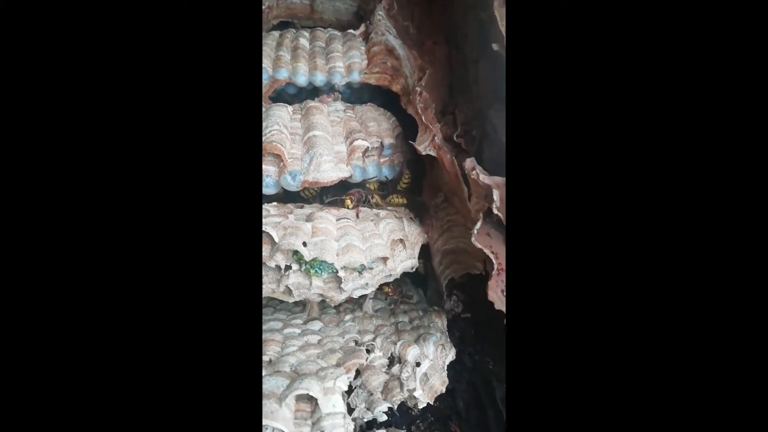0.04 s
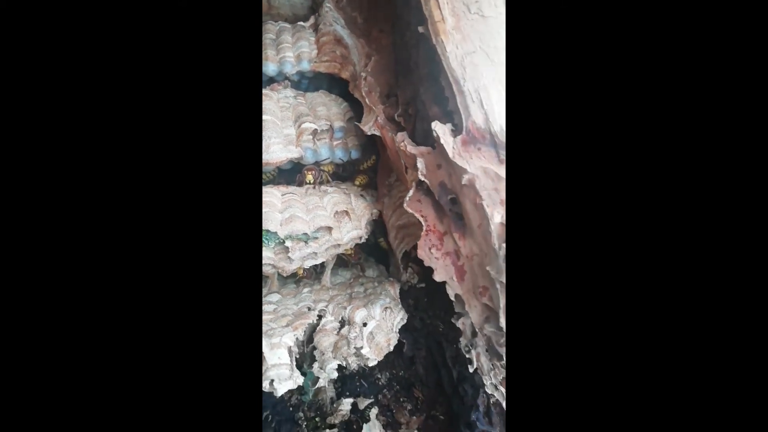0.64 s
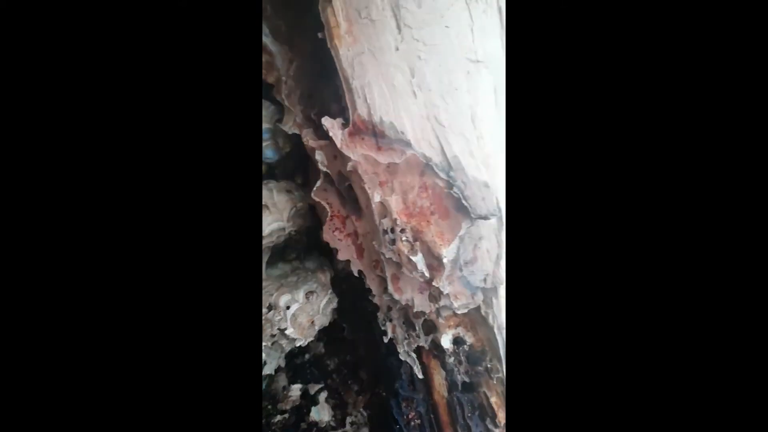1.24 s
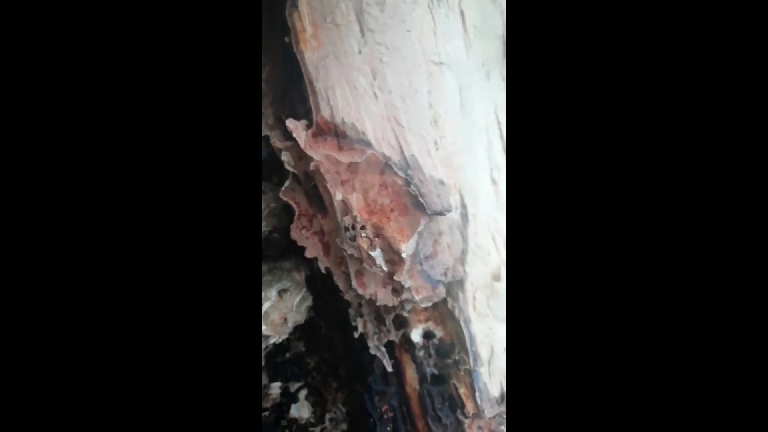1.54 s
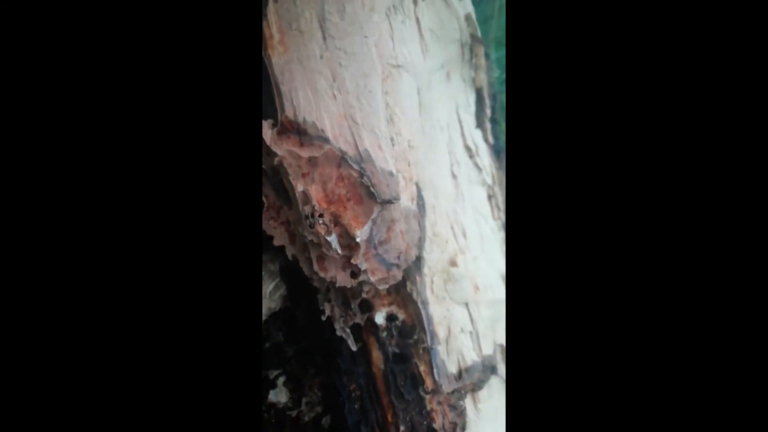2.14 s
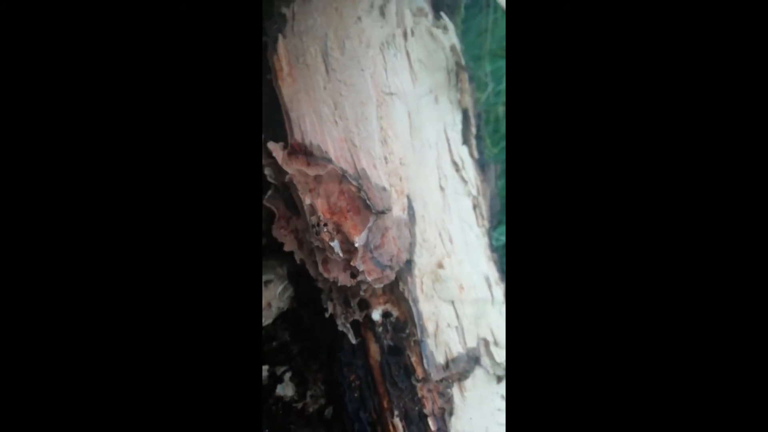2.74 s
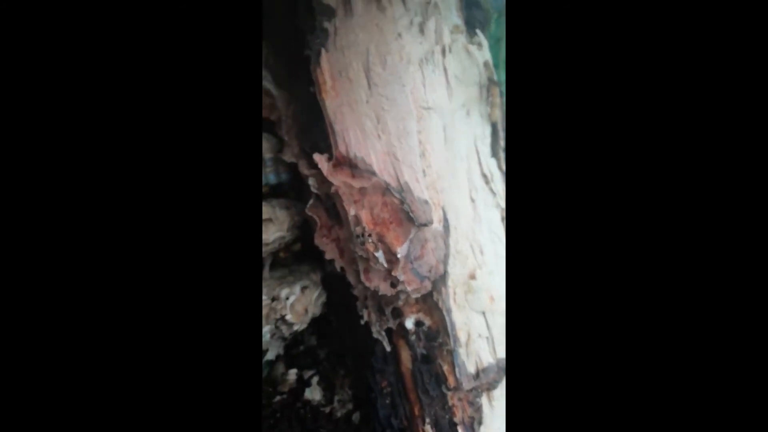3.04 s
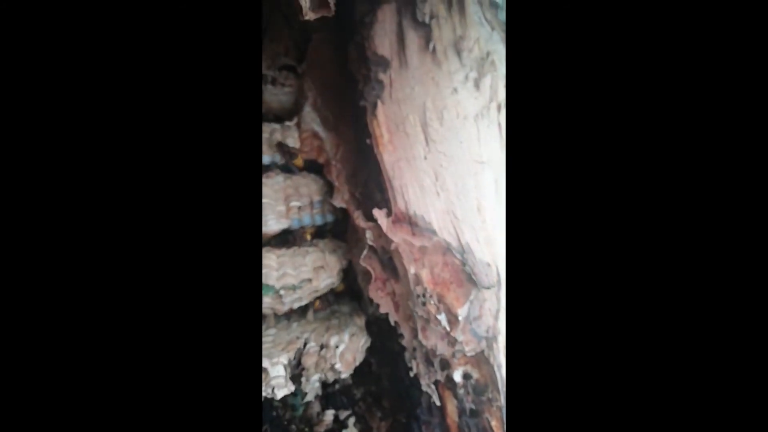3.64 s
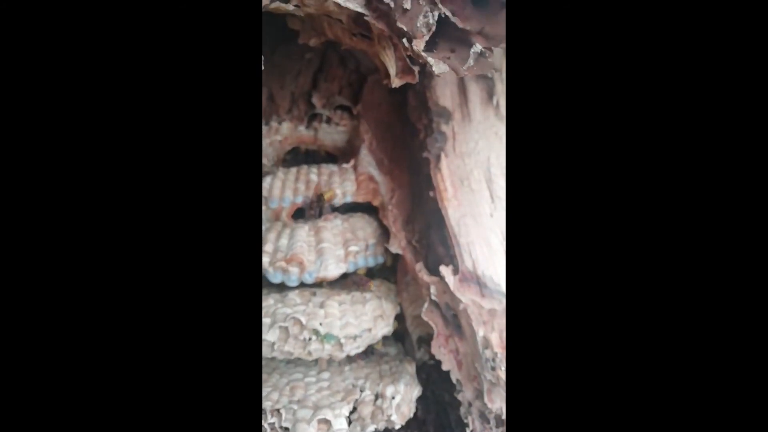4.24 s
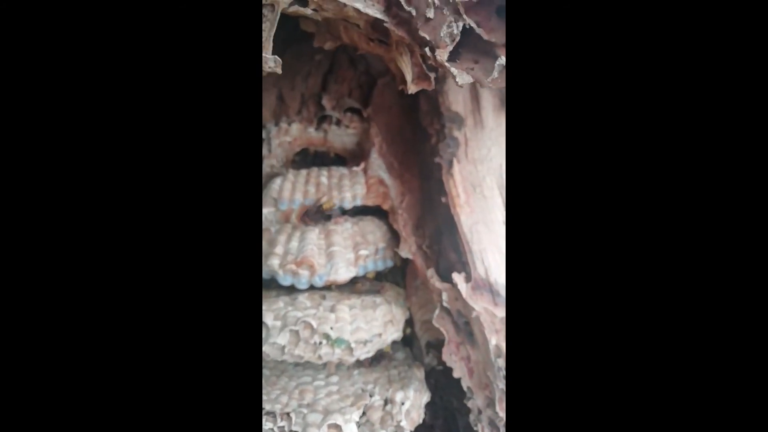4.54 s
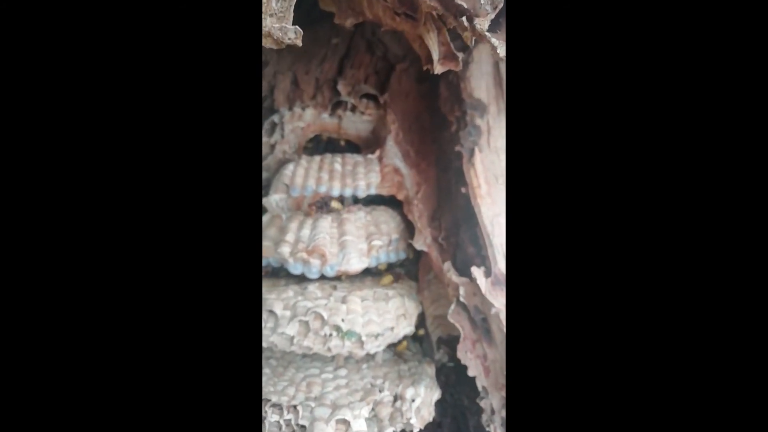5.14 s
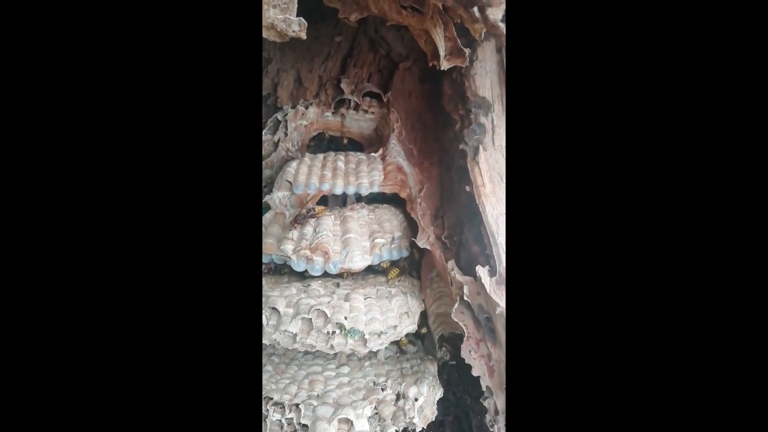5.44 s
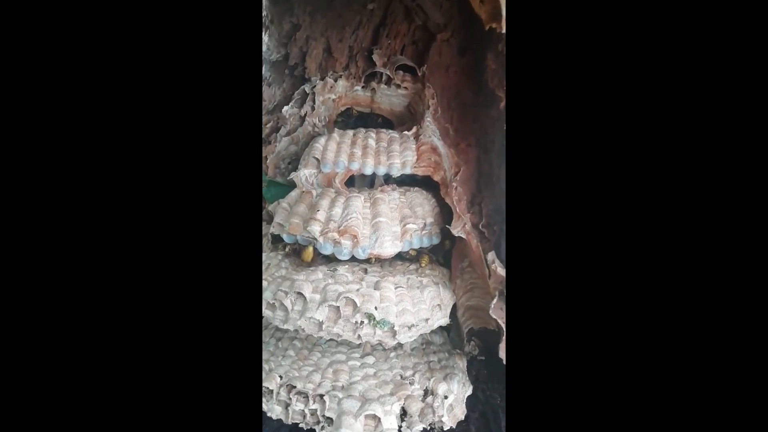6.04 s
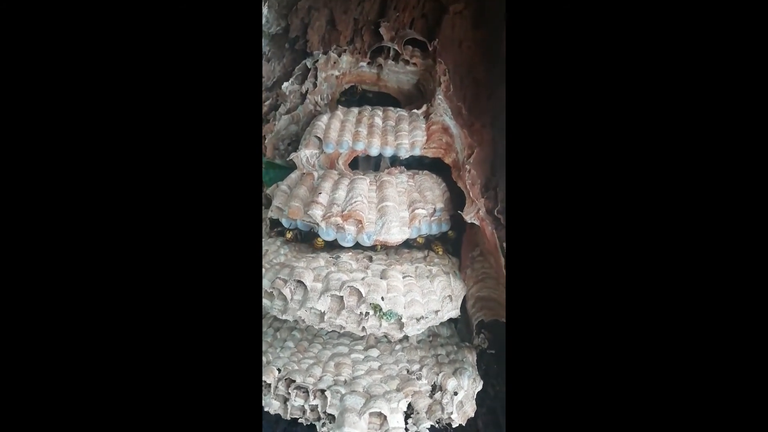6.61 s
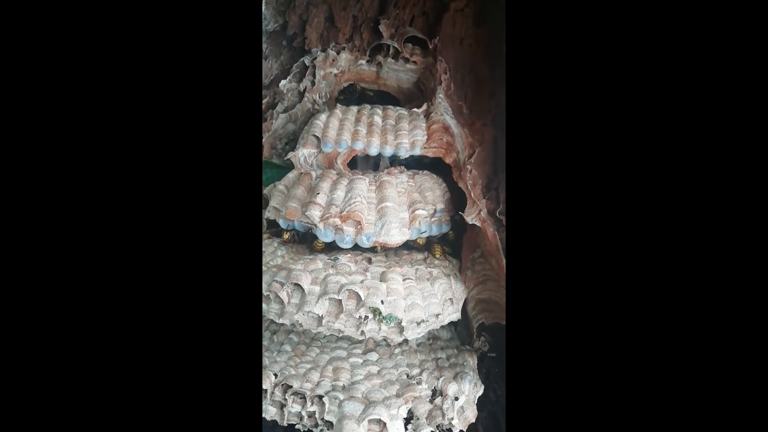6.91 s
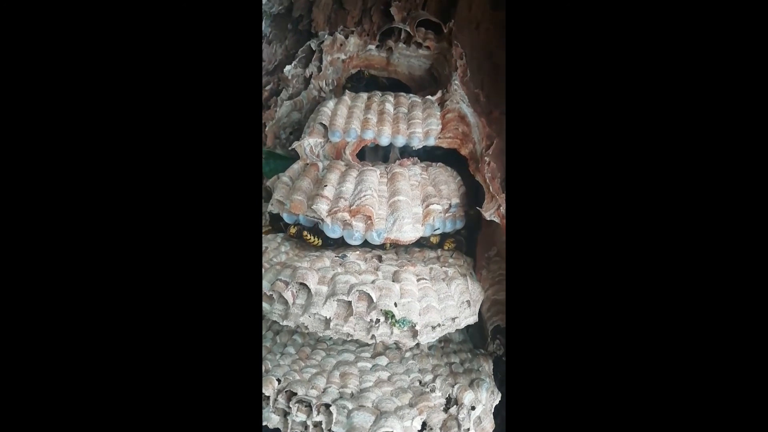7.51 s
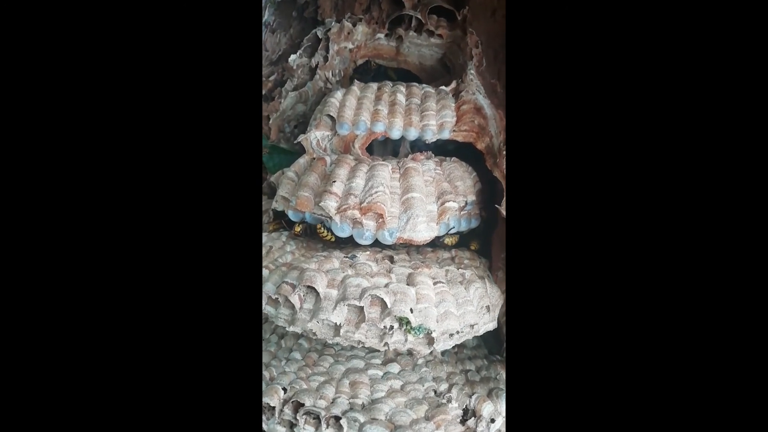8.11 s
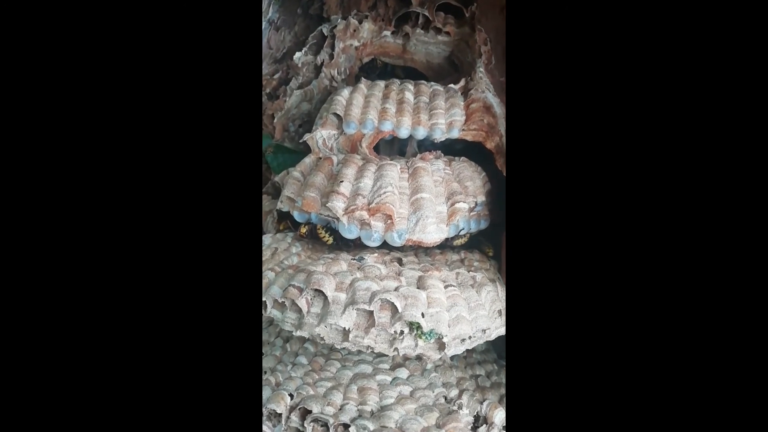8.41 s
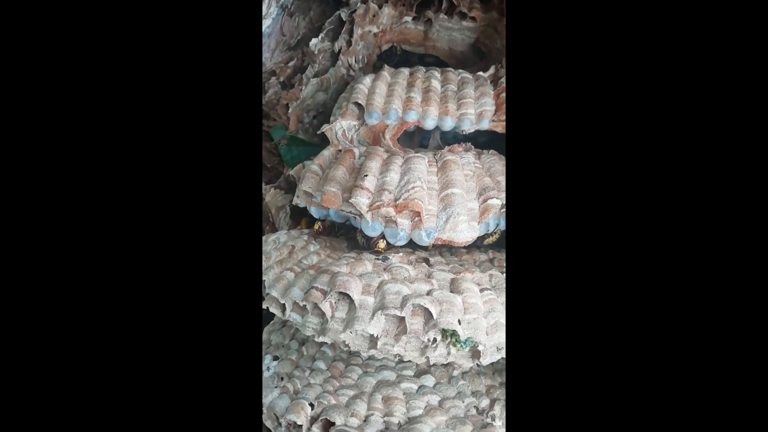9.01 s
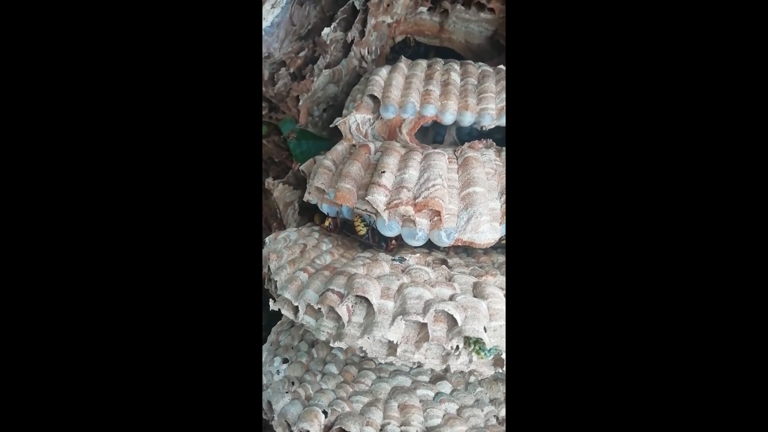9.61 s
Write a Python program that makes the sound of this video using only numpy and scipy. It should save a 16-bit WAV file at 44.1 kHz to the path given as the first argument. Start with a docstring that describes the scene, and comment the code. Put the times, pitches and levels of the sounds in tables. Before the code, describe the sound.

A hornet hovers close to a hand-held stereo microphone at the mouth of a hollow trunk, its low buzz wavering, then dulling to a hum and stopping about a third of the way in. Throughout, insects scrape and nibble the paper combs in irregular bouts of dry ticks and crackles. Puffs of wind bump the microphone, hardest near the end, over a faint woodland hiss.

```python
"""A hornet hovers at the mouth of a hollow trunk, close to a hand-held stereo microphone.
Its wingbeats pulse the air into a buzz, which dulls to a hum as it flies in, then stops.
Inside the trunk, workers scrape and nibble the paper combs in bouts of dry ticks.
Puffs of air bump the microphone now and then, over the hiss of a quiet wood."""
import sys
import numpy as np
from scipy import signal
from scipy.fft import rfft, irfft, next_fast_len
from scipy.io import wavfile
from scipy.ndimage import uniform_filter1d, map_coordinates

SR = 44100
rng = np.random.default_rng(int(sys.argv[2]) if len(sys.argv) > 2 else 0)


def wav_record(signal):
    """Record a signal, one row per channel, as 16-bit PCM in the file named by sys.argv[1]."""
    frames = np.transpose(np.atleast_2d(signal))
    bounded = np.clip(frames, -1, 1)
    # unit amplitude maps onto the largest positive 16-bit level
    quanta = np.round(bounded * 32767).astype(np.int16)
    wavfile.write(sys.argv[1], SR, quanta)


N = 434826


def amp(db):
    """Decibels to gain."""
    return 10 ** (np.asarray(db) / 20)


def unit(x):
    """Scaled to rms 1."""
    return x / np.sqrt(np.mean(x ** 2) + 1e-20)


def along(points, hz):
    """(frequency, value) points read on a log axis."""
    freqs, values = np.transpose(points)
    return np.interp(np.log(hz + 1), np.log(freqs + 1), values)


def curves(rows):
    """One value per sample for each column after the time."""
    times, *columns = np.transpose(rows)
    return [np.interp(np.arange(N) / SR, times, column) for column in columns]


def wobble(rate, size=N):
    """A smooth random curve, rate knots a second."""
    knots = rng.standard_normal(int(size * rate / SR) + 4)
    return map_coordinates(knots, [np.arange(size) * rate / SR])


def drift(rate, size):
    """Random knots joined by straight lines, rate a second."""
    knots = rng.standard_normal(int(size * rate / SR) + 2)
    return np.interp(np.arange(size) * rate / SR, np.arange(len(knots)), knots)


def swell(start, hold, attack_s, release_s):
    """An envelope that rises to 1 at start, holds and dies away."""
    t = np.arange(N) / SR - start
    return np.exp(np.minimum(t, 0) / attack_s - np.maximum(t - hold, 0) / release_s)


def coloured(x, spectrum, shift=1):
    """x through a (frequency, gain) spectrum whose frequencies are multiplied by shift."""
    size = x.shape[-1]
    padded = next_fast_len(size + size // 8)
    gain = amp(along(np.multiply(spectrum, [shift, 1]), np.fft.rfftfreq(padded, 1 / SR)))
    return irfft(rfft(x, padded) * gain, padded)[..., :size]


def noise_pair(shared, size=N):
    """White noise for two microphones that share a part (0-1) of its power."""
    common = np.sqrt(shared) * rng.standard_normal(size)
    return common + np.sqrt(1 - shared) * rng.standard_normal((2, size))


def panned(side_db):
    """Constant-power gains, left louder than right by side_db."""
    gains = amp(np.array([side_db, -side_db]) / 2).reshape(2, -1)
    return gains / np.sqrt(np.mean(gains ** 2, axis=0))


# The hiss all around the trunk: (frequency [Hz], gain [dB])
HISS_SPECTRUM = [(35, -46), (60, -35), (230, -7), (400, -17), (620, -20), (1300, -15), (1900, -20),
                 (5300, -22), (7200, -26), (8600, -18), (10200, -27), (15800, -27.5)]

def air(level_db=-71.5):
    """The steady hiss of a quiet wood and of the microphone."""
    return amp(level_db) * unit(coloured(noise_pair(0.026), HISS_SPECTRUM))


# Puffs of air right on the microphone: (time [s], level [dB], eddy life [s])
PUFFS = [(.697, -39, 0.022), (0.95, -31, 0.15), (1.317, -32.5, 0.021), (2.249, -40.5, 0.15),
         (2.659, -37.5, 0.22), (3.42, -31.5, 0.13), (3.666, -29, 0.11), (3.987, -37, 0.053),
         (4.489, -38, 0.026), (4.507, -34, 0.052), (5.475, -45, 0.065), (8.619, -25, 0.025),
         (8.643, -21.5, 0.035), (8.689, -20, 0.075), (8.788, -28, 0.086), (9.348, -41, 0.01),
         (9.457, -38.5, 0.042)]
# The light draught between puffs: (time [s], level [dB])
DRAUGHT = [(0, -57.5), (1.8, -61), (3, -62), (5, -64.5), (7.2, -69.5), (9.86, -61.5)]
# The rumble of eddies and the thud of one buffet: (frequency [Hz], gain [dB])
RUMBLE_SPECTRUM = [(11, -26), (20, -7.5), (40, 3), (64, 0), (81, -4.5), (151, -11.5), (275, -27),
                   (334, -28.5), (500, -56), (650, -58), (1100, -120)]
THUD_SPECTRUM = [(15, -10), (50, 9.5), (90, 6.5), (140, -5), (200, -14.5), (300, -34), (480, -57),
                 (1400, -120)]

def wind_on_microphone(eddy_db=-11.5, thud_db=-2, push_s=0.00986, shared=0.95):
    """Each puff buffets the microphone and stirs up low eddies, nearly the same on both sides."""
    eddies = [amp(db + eddy_db) * swell(s, 0, 0.75 * life, life) for s, db, life in PUFFS]
    level = np.hypot(amp(curves(DRAUGHT)[0]), np.max(eddies, axis=0))
    lumpy_air = noise_pair(shared) * amp(4.5 * wobble(22))
    out = level * unit(coloured(lumpy_air, RUMBLE_SPECTRUM))
    size = 16384
    push = np.exp(-((np.arange(size) - size // 2) / SR / push_s) ** 2 / 2)
    for s, db, _ in PUFFS:
        shift = np.exp(0.031 * (db + 30))  # faster air hits harder and sheds higher eddies
        thud = coloured(noise_pair(shared, size) * push, THUD_SPECTRUM, shift) * np.hanning(size)
        start = round((s + push_s) * SR) - size // 2
        out[:, start:start + size] += amp(db + thud_db) * thud / np.max(np.abs(thud))
    return out


# How long the inside of the trunk rings: (frequency [Hz], time to fall 60 dB [s])
TRUNK_DECAY = [(300, 0.072), (3000, 0.17), (12000, 0.023)]

def trunk_echo(x):
    """The short answer of the trunk's cavity."""
    hz, t, spectra = signal.stft(rng.standard_normal((2, SR // 6)), SR, nperseg=256)
    decay = amp(-60 * t / along(TRUNK_DECAY, hz)[:, None])
    tail = signal.istft(spectra * decay, SR, nperseg=256)[1]
    return signal.fftconvolve(x, tail / np.linalg.norm(tail[0]), axes=1)[:, :N]


# A claw on paper, a thick fibre cracking, and fine scraping: (frequency [Hz], gain [dB])
CLAW_SPECTRUM = [(1500, -16.5), (4000, -13.5), (5500, -11.5), (7300, -5.5), (8900, 0.5), (10500, -12),
                 (15500, -25.5)]
CRACK_SPECTRUM = [(500, -60), (1100, -22), (1700, -5), (2800, 6.5), (3700, 0.5), (4900, 4), (7000, 4),
                  (12000, -29)]
SCRAPE_SPECTRUM = [(1000, -11), (1800, -7.5), (2800, -10.5), (4000, -12.5), (5300, -11), (6300, -10),
                   (7300, -7.5), (8700, -1), (9400, -8.5), (10500, -14), (12000, -22), (15500, -28)]

def rustle(strength, crunch_db, claw_db=-2.5, scrape_db=-7, scratches_per_s=200, rise_s=0.00071):
    """Many small scratches of feet and jaws on the combs, coming in fits over a finer scraping."""
    onsets = rng.random(N) < scratches_per_s / SR
    sizes = amp(6 * np.clip(rng.standard_normal(N), -2, 1.4))
    age = np.arange(SR // 100) / SR / rise_s
    scratches = unit(signal.fftconvolve(onsets * sizes, age ** 2 * np.exp(-2 * age))[:N])
    claws = amp(claw_db) * unit(coloured(noise_pair(0.044) * scratches, CLAW_SPECTRUM))
    crunch = amp(crunch_db - 5) * unit(coloured(noise_pair(0.11) * scratches, CRACK_SPECTRUM))
    scraping = amp(scrape_db) * unit(coloured(noise_pair(0.098), SCRAPE_SPECTRUM))
    fits = amp(1.5 * wobble(18))
    return strength * fits * (claws + scraping + crunch)


# The loudest snaps of paper fibres in the trunk: (time [s], level [dB], relative low crack [dB])
LOUD_SNAPS = [(.246, -34.5, -28), (.54, -36.5, -12), (.638, -34, -17), (.788, -38, -12), (1.0765, -30, -18),
              (1.088, -37, -24), (1.102, -38, -17), (1.119, -28.5, -19), (1.131, -32, -26),
              (1.142, -37, -22), (1.147, -26.5, -30), (1.164, -34, -19), (1.386, -32, -3.5),
              (2.861, -37, -10), (2.87, -32, -16), (3.125, -39, -8), (3.16, -34.5, -9), (3.183, -36, -7),
              (4.686, -39, -9), (4.71, -48, -21), (4.737, -38.5, -13), (4.836, -38.5, -9),
              (4.858, -38.5, -19), (5.524, -38.5, -27), (5.535, -38, -25), (5.555, -33, -32),
              (5.573, -37, -16), (5.588, -30.5, -17), (5.604, -40, -32), (5.614, -36, -25),
              (5.642, -32, -18), (5.653, -36, -14), (5.682, -33.5, -15), (5.695, -36, -24),
              (5.722, -31, -27), (5.736, -43, -28), (5.752, -28.5, -14), (5.762, -33.5, -14),
              (5.77, -33, -17), (5.932, -50.5, 3), (5.96, -51, 0), (6.313, -44, -14), (6.333, -46, -11),
              (6.329, -40.5, -16), (6.362, -36.5, -17), (7.471, -37, -10.5), (7.539, -40, -21),
              (7.556, -39, -24), (7.684, -50, 9.5), (7.957, -41, -8), (8.005, -40.5, -6), (8.052, -40, -5),
              (8.057, -39, -2.5), (8.075, -37.5, -3.5), (8.084, -36.5, -9), (8.104, -38.5, -4),
              (8.221, -39.5, -12), (8.233, -41.5, -4), (8.238, -40, -17), (9.526, -33.5, -30),
              (9.572, -41, -21), (9.598, -42.5, -7), (9.671, -37.5, -4.5), (9.821, -33, -28),
              (9.831, -33, -19)]
# The bright top of a snap: (frequency [Hz], gain [dB])
SNAP_SPECTRUM = [(900, -60), (2500, -17), (4500, -79), (6200, 7), (7200, -3), (8500, 12.5), (9500, 7.5),
                 (10500, -7), (12000, -5.5), (15500, -58)]

def fibre_snaps(lesser_snaps, width_s=0.00055, size=1024):
    """A fibre tears in about a millisecond, each at its own pitch; thicker ones crack lower as well."""
    from_peak = np.abs(np.arange(size) - size // 2) / SR / width_s
    envelope = np.exp(-from_peak ** 2 / 2) + 0.23 * np.exp(-from_peak / 3)
    out = np.zeros((2, N + 2 * size))
    for s, db, crack_db in LOUD_SNAPS + lesser_snaps:
        snap_shift = np.exp(0.065 * rng.uniform(-1, 1))
        snap = amp(-6) * unit(coloured(noise_pair(0.14, size), SNAP_SPECTRUM, snap_shift))
        crack_shift = min(np.exp(-0.045 * (crack_db + 3)), 1.35)  # thicker fibres crack deeper
        crack = amp(crack_db - 5) * unit(coloured(noise_pair(0.4, size), CRACK_SPECTRUM, crack_shift))
        start = round(s * SR)
        out[:, start:start + size] += amp(db) * envelope * (snap + crack)
    return out[:, size // 2:][:, :N]


def nibbles(strength, crunch_db, per_s=56, over_rustle_db=11.5, spread_db=5.5, thin_db=-13.5):
    """Jaws tear thinner fibres at random moments, following the bout's strength: rows like LOUD_SNAPS."""
    delays, sizes = rng.random((1024, 2)).T
    times = (np.arange(len(delays)) + 2 * delays) / per_s
    sizes_db = over_rustle_db + spread_db * (2 * sizes - 1)
    return [(i / SR, 20 * np.log10(strength[i] + 1e-9) + db, crunch_db[i] + thin_db)
            for i, db in zip((times * SR).astype(int), sizes_db) if i < N]


# Bouts of work at the combs:
# (start [s], hold [s], level [dB], relative low crunch [dB], left over right [dB])
BOUTS = [(0.165, .21, -67, -22, -8), (0.544, 0.15, -55.5, -17, -3.5), (0.787, 0.18, -57.5, -9, -1),
         (1.082, 0.09, -54, -11, 1), (1.322, .19, -57.5, -27, 0.5), (2.449, 0.35, -65.5, -0.5, 0),
         (2.847, 0.043, -66, -18, 4), (3.078, 0.15, -59.5, -0.5, 0.5), (4.16, 0.11, -65, -22, -1),
         (4.617, 0.15, -65, -23, -5.5), (4.865, 0.037, -64, -14, -1), (5.355, 0.14, -61.5, -29, -2.5),
         (5.533, 0.28, -62, -17, -5), (5.86, 0.12, -66, 2.5, 0), (6.32, 0.027, -73, -17, 7),
         (7.462, 0.11, -61, -7, 2), (7.969, 0.16, -66, 1.5, 3.5), (8.167, 0.099, -59, -4, 5),
         (9.546, 0.17, -65.5, -1, 4), (9.856, .03, -54, 0, 1.5)]

def workers(right_lag_samples=16):
    """Workers scrape and snap the paper in bouts; the strongest bout sets the crunch and the side."""
    bouts = np.array([amp(db) * swell(s, hold, attack_s=0.02, release_s=0.032)
                      for s, hold, db, _, _ in BOUTS])
    strength = bouts.sum(axis=0)
    crunch_db, side_db = np.array(BOUTS)[bouts.argmax(axis=0), -2:].T
    chewing = rustle(strength, crunch_db) + fibre_snaps(nibbles(strength, crunch_db))
    left, right = chewing * panned(side_db)
    return np.array([left, np.roll(right, right_lag_samples)])


# The colony's constant stir, heard from outside the trunk: (time [s], level [dB])
COLONY_STIR = [(0, -54.5), (1.8, -61), (2.9, -57), (3.9, -62), (5.1, -68.5), (6, -64.5), (6.6, -69.5),
               (7.7, -66.5), (8.6, -63), (9.2, -66.5), (9.86, -63)]

def nest(echo_db=-16):
    """The colony rustles under the workers' bouts, and the trunk answers both."""
    stir = rustle(amp(curves(COLONY_STIR)[0]), crunch_db=-24, claw_db=-6, scrape_db=-5.5)
    direct = stir + workers()
    return direct + amp(echo_db) * trunk_echo(direct)


# Stiff flakes of comb, heard dead centre: (time [s], peak level [dB], pitch [Hz])
FLAKES = [(1.855, -60, 2950), (2.859, -44, 3650), (2.87, -48, 3400), (2.87, -41, 4630), (2.87, -41.5, 4070),
          (7.47, -52, 4740)]

def comb_flakes(t60_s=0.022):
    """Each flake rings briefly at its own pitch when it snaps."""
    t = np.arange(SR // 10) / SR
    out = np.zeros(N)
    for s, db, hz in FLAKES:
        ring = np.sin(2 * np.pi * hz * t + 0.5 * drift(430, len(t)))
        out[round(s * SR):][:len(t)] += amp(db - 60 * t / t60_s) * ring
    return out


# The wings' low overtones, their mid buzz and the rasp of their edges: (frequency [Hz], gain [dB])
BODY_SPECTRUM = [(290, 7), (370, -1), (500, 3.5), (630, 4.5), (750, -6), (950, -24.5)]
BUZZ_SPECTRUM = [(650, -16), (790, -12), (880, 2.5), (1030, 2.5), (1250, -0.5), (1450, -3.5), (1650, -2.5),
                 (1900, -6.5), (2300, -50)]
RASP_SPECTRUM = [(2100, -25), (2500, -7), (2750, 0), (2950, 0), (3250, -7), (3600, -21), (6000, -35)]
# The trunk's reflection colours a band that moves with the hornet: (time [s], centre [Hz], gain [dB])
REFLECTION = [(.1, 1120, 2), (.5, 1020, 5.5), (.8, 1100, -12), (.95, 980, 6), (1.08, 925, 10),
              (1.25, 1000, 1), (2.25, 980, 0), (2.45, 990, 4), (2.58, 861, 8), (2.9, 860, 13.5)]
# From inside, the hollow lifts low overtones and hides high ones: (frequency [Hz], gain [dB])
INSIDE_SPECTRUM = [(370, 15), (500, 8), (630, -4), (760, 4.5), (900, -5.5), (1300, -2.5), (2000, -5)]
CRUISE_HZ = 130

def wing_overtones(phase, pitch, rough, inside, body, buzz, rasp, reflection_width_hz=80):
    """Harmonics of the wingbeat, coloured by the trunk's reflection and by its hollow."""
    size = len(pitch)
    orders = np.arange(3, 34)
    shares = [amp(along(shape, orders * np.mean(pitch))) for shape in (BODY_SPECTRUM, BUZZ_SPECTRUM)]
    body_shares, buzz_shares = [share / np.linalg.norm(share) for share in shares]
    rasp_shift = (pitch / CRUISE_HZ) ** 4.5  # harder strokes stiffen the wing and lift its rasp
    centre_hz, lift_db = [curve[:size] for curve in curves(REFLECTION)]
    out = np.zeros((2, size))
    for k, body_share, buzz_share in zip(orders, body_shares, buzz_shares):
        hz = k * pitch
        edge = rasp * amp(along(RASP_SPECTRUM, hz / rasp_shift)) / 2
        strength = np.sqrt(2) * (body * body_share + buzz * buzz_share + edge)
        fading_db = 3.2 * drift(12, size)  # reflections fade each overtone slowly
        reflection_db = lift_db / (1 + ((hz - centre_hz) / reflection_width_hz) ** 2)
        hollow_db = inside * along(INSIDE_SPECTRUM, hz)
        smear = rough * drift(70, size) + rng.normal()  # uneven strokes blur the phase
        out += strength * amp(fading_db + reflection_db + hollow_db) * np.cos(k * phase + smear)
    return out


def wing_turbulence(phase, rough, inside, body, buzz, rasp, wake_db=-4, swish_db=-7):
    """The wings shed a puff of turbulence once a beat: a low wake and a swish from their edges."""
    pulses = (2 + np.cos(phase)) ** 2
    low, mid, high = [unit(coloured(noise_pair(0.093, len(rough)) * pulses, shape))
                      for shape in (BODY_SPECTRUM, BUZZ_SPECTRUM, RASP_SPECTRUM)]
    wake = rough * (body * low + (2 - inside) * buzz * mid)
    return amp(wake_db) * wake + amp(swish_db) * rasp * high


# The two low tones trade places as the hornet turns: (time [s], stroke tone over octave [dB])
HEADING = [(0, 3), (.3, 9.5), (.43, -9), (.56, -19), (.68, -4), (.8, -11), (.9, 3.5), (1.04, 18.5),
           (1.24, -12), (1.9, -21), (2.13, -18), (2.28, 7.5), (2.48, -9.5), (2.6, -8), (2.72, 3), (3.45, 1)]

def stroke_tones(phase, near_db, boost_db=13, sway_db=1.1):
    """Up- and downstroke give two strong, clean tones; each wavers as the body sways."""
    size = len(near_db)
    balance_db = curves(HEADING)[0][:size]
    octave_db = near_db + boost_db - 10 * np.log10(1 + amp(balance_db) ** 2)
    return np.sqrt(2) * sum(amp(db + sway_db * drift(21.97, size)) * np.sin(k * phase)
                            for k, db in ((1, octave_db + balance_db), (2, octave_db)))


# Spurts of hard strokes: (start [s], hold [s], rasp level [dB], low overtone gain [dB])
SPURTS = [(0.804, 0.096, -65, 4.5), (0.878, 0.09, -62, -1.5), (1.285, 0.04, -70.5, 2)]

def wing_effort(pitch, near_db, level_rough=0.4, turn_rough=0.62, sharp_turn_hz_per_s=130):
    """Sharp turns roughen the strokes; nearness sets body, buzz and rasp;
    spurts even the strokes, lift the rasp and shift the body."""
    spurts = np.array([swell(s, hold, attack_s=0.013, release_s=0.046)[:len(pitch)]
                       for s, hold, _, _ in SPURTS])
    rasp_db, lift_db = np.array(SPURTS)[:, -2:].T
    turning = uniform_filter1d(np.abs(np.gradient(pitch, 1 / SR)), size=4096) / sharp_turn_hz_per_s
    rough = level_rough + (turn_rough - level_rough) * np.minimum(turning, 1) ** 2
    rough *= 1 - spurts.max(axis=0) / 3
    force_db = 0.52 * (pitch - CRUISE_HZ)  # faster strokes are harder
    body = amp(near_db + 4 + force_db + lift_db @ spurts)
    buzz = amp(near_db - 3.5)
    rasp = amp(near_db - 26) + np.max(amp(rasp_db)[:, None] * spurts, axis=0)
    return rough, (body, buzz, rasp)


# The wingbeat jumps with each spurt and sags after it: (time [s], pitch [Hz])
WINGBEAT = [(0.0, 125.8), (0.074, 127.8), (0.168, 122.9), (0.296, 127.1), (0.46, 121), (0.622, 120.4),
            (0.825, 132.9), (.96, 127.4), (1.188, 124.6), (1.254, 122), (1.3, 131.9), (1.66, 121.5),
            (2.02, 119.5), (2.22, 123.7), (2.26, 119.7), (2.36, 122.5), (2.405, 116.6), (2.44, 121.2),
            (2.54, 121.5), (2.58, 127.2), (2.65, 117.7), (2.69, 117.8), (2.75, 129.2), (2.93, 121.7),
            (3.44, 129.4), (3.48, 118.7), (3.52, 117.3)]
# The hornet nears the microphone and recedes: (time [s], level [dB])
NEARNESS = [(0, -59.5), (.3, -60), (.42, -62), (.68, -58), (.82, -61.5), (.96, -58.5), (1.16, -63),
            (1.29, -70.5), (1.48, -63), (1.6, -69.5), (1.69, -66), (1.87, -69), (2.15, -66.5),
            (2.45, -63.5), (2.6, -59), (2.75, -66), (2.86, -64.5), (3.0, -70), (3.28, -69), (3.4, -67.5)]
FALTER_S, FALTER_HALF_S, FALTER_DB = 0.737, 0.043, -22  # the wings falter once
ENTER_S, INSIDE_S = 2.42, 3.017  # it slips into the trunk between these times
SILENT_S, STOPPING_S = 3.56, 0.081  # when the wings are still; how long they take to stop

def hornet(side_db=5, jitter=0.006, left_lead_s=0.00078):
    """Close up and a little to the left, each wingbeat is a pulse of air; turns make the beats uneven."""
    size = int(np.ceil(SILENT_S) * SR)
    t = np.arange(size) / SR
    pitch, near_db = [curves(rows)[0][:size] for rows in (WINGBEAT, NEARNESS)]
    near_db += FALTER_DB * np.exp(-((t - FALTER_S) / FALTER_HALF_S) ** 4)
    inside = np.clip((t - ENTER_S) / (INSIDE_S - ENTER_S), 0, 1)
    rough, gains = wing_effort(pitch, near_db)
    phase = 2 * np.pi * np.cumsum(pitch * (1 + jitter * wobble(39.89, size))) / SR
    lead_s = left_lead_s * (1 - inside / 4)  # the sound reaches the left microphone first
    phase = phase + np.pi * pitch * lead_s * np.array([[1], [-1]])
    tones = stroke_tones(phase, near_db) * panned(side_db / 5)  # long waves differ little by side
    overtones = np.sqrt(1 - rough ** 2) * wing_overtones(phase, pitch, rough, inside, *gains)
    turbulence = wing_turbulence(phase, rough, inside, *gains)
    out = tones + (overtones + turbulence) * panned(side_db)
    out *= amp(0.9 * drift(60, size))  # no two beats are equally strong
    out *= np.clip((SILENT_S - t) / STOPPING_S, 0, 1) ** 2
    return np.pad(out, ((0, 0), (0, N - size)))


def scene():
    """At the mouth of the trunk: the hornet close by, the open air, and the nest in its hollow."""
    return hornet() + wind_on_microphone() + air() + nest() + comb_flakes()


def record(dry):
    """The hand-held camera behind the microphone keeps nothing above its band limit."""
    top_hz = 15850
    padded = next_fast_len(N + SR // 4)
    passband = np.fft.rfftfreq(padded, 1 / SR) < top_hz
    return irfft(rfft(dry, padded) * passband, padded)[:, :N]


dry = scene()
out = record(dry)
wav_record(out)
```